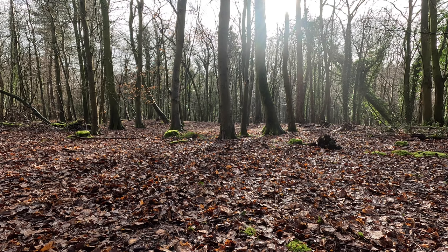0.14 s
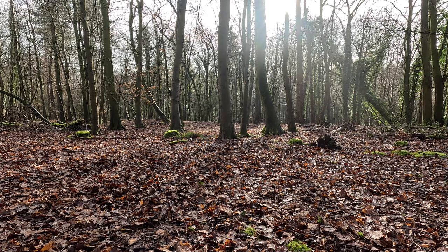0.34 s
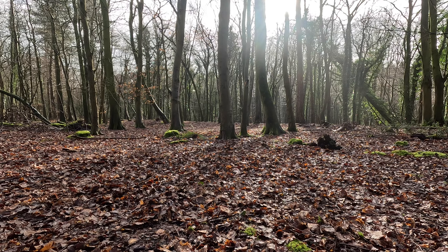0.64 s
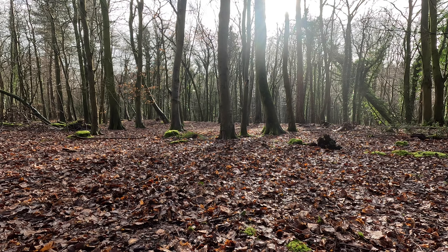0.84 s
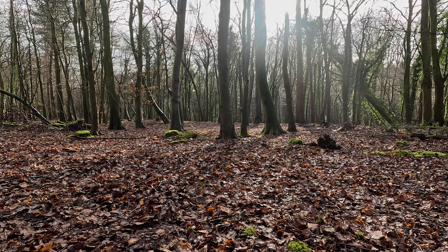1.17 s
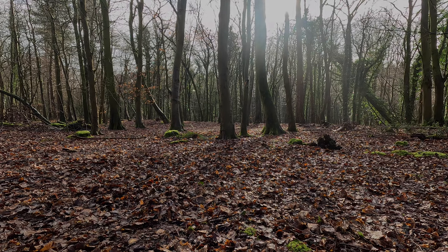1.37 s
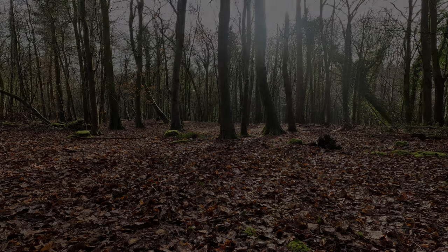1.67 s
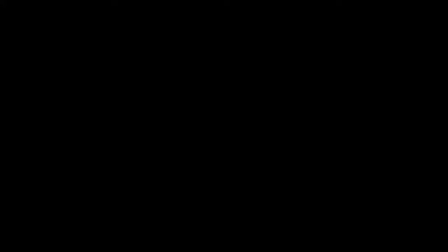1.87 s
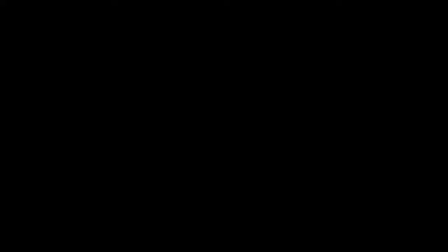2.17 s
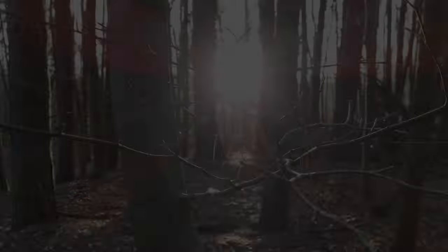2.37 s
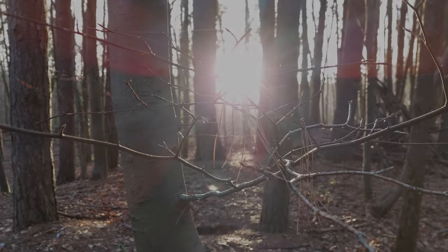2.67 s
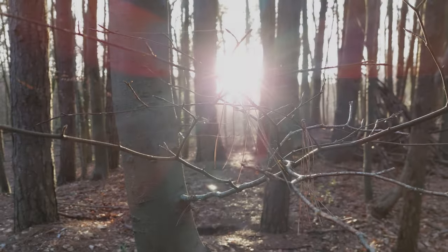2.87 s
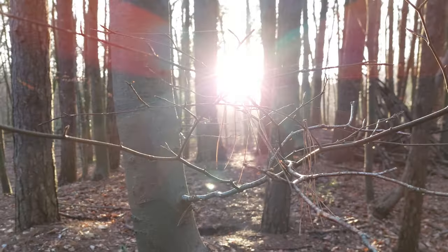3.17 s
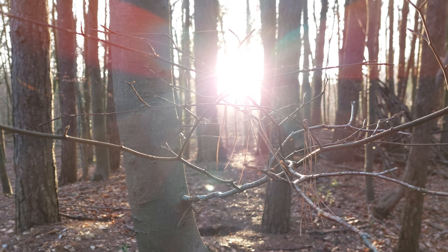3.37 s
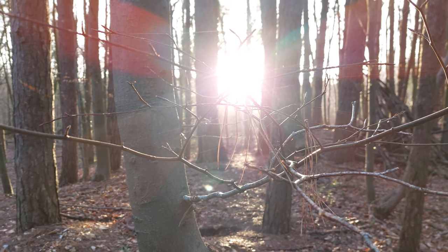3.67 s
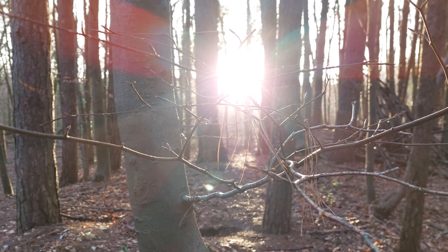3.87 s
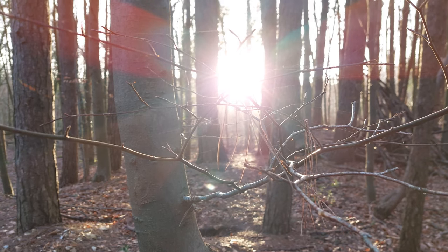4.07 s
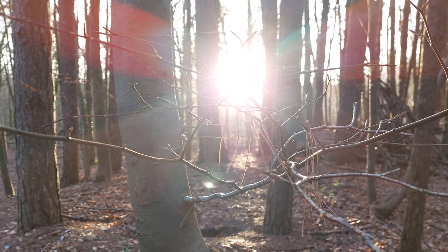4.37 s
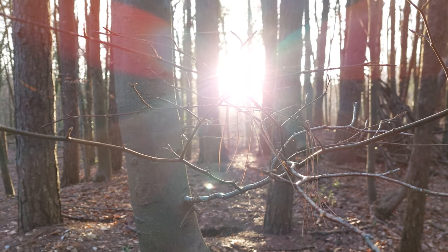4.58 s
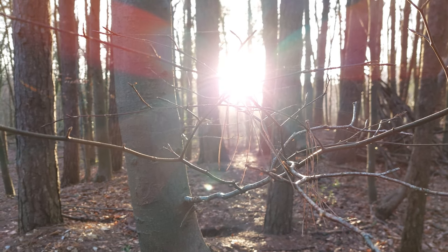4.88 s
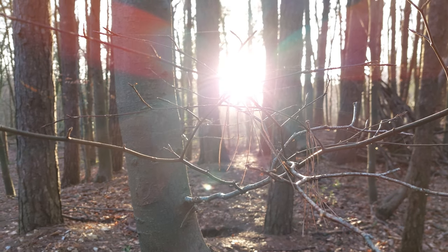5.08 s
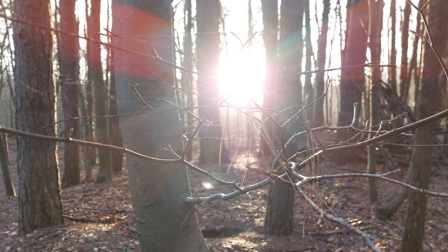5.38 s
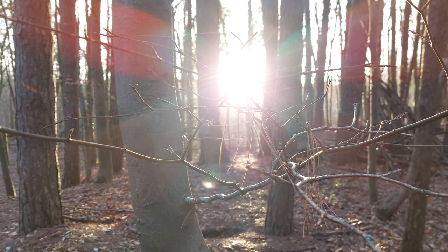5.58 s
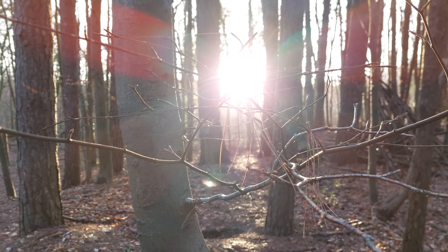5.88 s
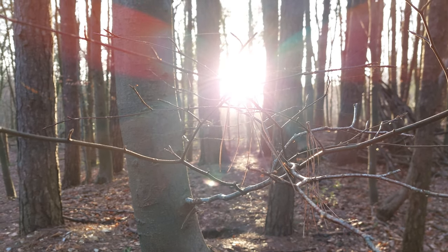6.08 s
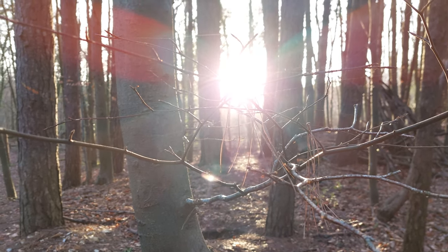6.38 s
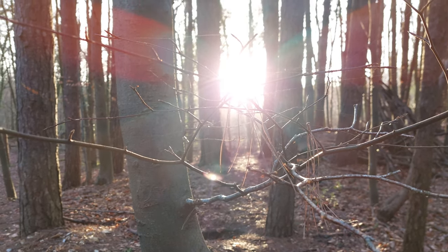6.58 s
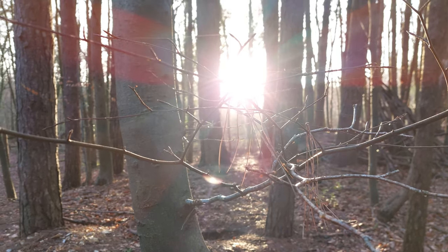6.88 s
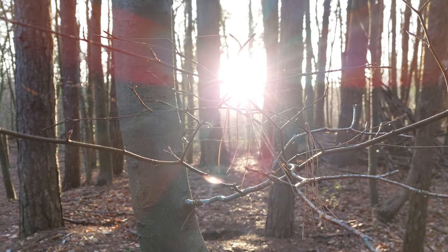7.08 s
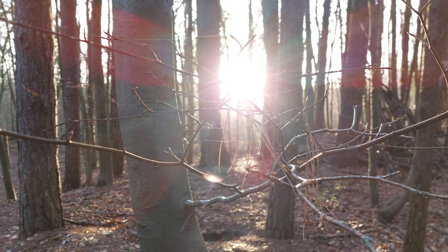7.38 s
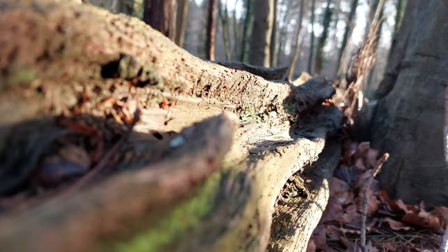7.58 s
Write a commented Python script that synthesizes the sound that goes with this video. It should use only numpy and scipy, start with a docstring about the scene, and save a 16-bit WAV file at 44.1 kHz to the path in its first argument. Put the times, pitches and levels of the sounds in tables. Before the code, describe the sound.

Small woodland birds buzz, whistle and trill over a rumble that fades to faint drone and hiss; twigs snap and a dull knock sounds late.

```python
"""A low rumble and a buzzy bird song open the scene; the rumble later fades to a quiet far drone and hiss.
Whistles, thin high calls and far trills are heard from the rumble onward; zigzag warbles and three trills
of hooked down-sweeps come later. Birds are swept tones, scattered by trunks into a soft tail; rumble, drone
and hiss are coloured noise. Dry leaves rustle close on the right as noise grains, with noise-burst snaps
and a knock and tap of decaying modes. The background drops just before the end.
"""
import sys
import numpy as np
from scipy import signal
from scipy.fft import rfft, irfft
from scipy.io import wavfile
from scipy.ndimage import uniform_filter1d

SR = 44100
rng = np.random.default_rng(int(sys.argv[2]) if len(sys.argv) > 2 else 0)


def to_wav(s):
    """Save 16-bit WAV."""
    ch = np.atleast_2d(s).T  # columns
    pcm = np.round(np.clip(ch, -1, 1) * 32767)  # PCM
    wavfile.write(sys.argv[1], SR, pcm.astype(np.int16))


N = 341334
TIME = np.arange(N) / SR

# Levels are relative, ahead of the mix gains. pan_db is left over right; scatter is a share 0-1.
# Rumble spectrum: freq_hz, level_db
RUMBLE_COLOUR = [(12, -23.5), (25, -11), (55, -2), (80, 0), (110, -3.5), (150, -8), (195, -12.5),
                 (300, -18.5), (410, -27), (560, -43), (1000, -44), (2000, -50.5), (7000, -53),
                 (11000, -75.5)]
# Rumble band that fills in: low_hz, high_hz, first_db, later_db, at_s
RUMBLE_BAND = (215, 399, -4.5, 1.5, 0.52)
RUMBLE_DB, RUMBLE_HOLD_S, RUMBLE_FALL_DB_PER_S = -40.5, 1.593, 17
# Level of the drone's lower resonance: time_s, level_db
LOW_DRONE_LEVEL = [(2.2, -63), (2.45, -58), (2.72, -73), (2.88, -56.5), (3.12, -68), (3.4, -60),
                   (3.88, -65), (4.05, -56.5), (4.2, -67.5), (4.35, -59), (4.62, -69.5), (5.4, -59.5),
                   (5.6, -52), (6.1, -53), (6.35, -46.5), (6.6, -49.5), (6.87, -64), (7.3, -53),
                   (7.7, -65.5)]
# Level of its upper resonance: time_s, level_db
HIGH_DRONE_LEVEL = [(2.2, -73), (2.5, -67), (2.8, -63.5), (3.15, -71), (3.7, -61.5), (3.87, -67),
                    (4.2, -63.5), (4.32, -54), (4.5, -67.5), (4.85, -64.5), (5.03, -66.5), (5.2, -58.5),
                    (5.55, -53.5), (5.7, -62), (6.1, -55.5), (6.2, -56.5), (6.34, -46.5), (6.5, -56),
                    (6.85, -59), (7, -56), (7.7, -69.5)]
# Lower resonance spectrum: freq_hz, level_db
LOW_DRONE_COLOUR = [(20, -40), (70, -15), (105, -5), (135, 3.5), (165, -5.5), (205, -17), (400, -42),
                    (1000, -75)]
# Upper resonance spectrum: freq_hz, level_db
HIGH_DRONE_COLOUR = [(100, -45), (205, -13), (265, 1), (305, -6.5), (370, -17), (500, -22.5), (900, -38.5),
                     (2000, -55), (8000, -75)]
DRONE_BASS_DB, DRONE_BASS_SHARE = -41, 0.28  # bass follows this share of the lower resonance's dB
# Hiss spectrum: freq_hz, level_db
AIR_COLOUR = [(200, -7), (450, 2), (750, 0), (1100, -4.5), (1600, -13), (2500, -13), (4000, -18.5),
              (8000, -21), (16000, -22.5)]
# Hiss band that fills in: low_hz, high_hz, first_db, later_db, at_s
AIR_BAND = (601, 1099, -2.5, 0.7, 1.5)
AIR_DB, AIR_FULL_S, AIR_RISE_DB_PER_S = -68.5, 2.84, 7
# Likeness of the two ears' noise: freq_hz, correlation
EAR_LIKENESS = [(30, 0.9), (70, 1), (140, 0.77), (280, 0.91), (600, 0.3), (1200, 0.063)]
BAND_FILL_HALF_S = 0.065
DROP_S, DROP_LENGTH_S, DROP_DB = 7.54, 0.022, -10

# Decay time of the wood's scatter: freq_hz, t60_s
WOOD_T60 = [(500, 0.17), (3000, 0.86), (5000, 0.96), (8000, 0.67), (16000, 0.15)]
# Echoes off the nearest trunks: delay_s, level_db, pan_db
TRUNK_ECHOES = [(.0125, -12, -3), (.0215, -15, 3)]

# Pitch arch of a buzzy syllable: share_of_syllable, pitch_factor
BUZZ_ARCH = [(0, .79), (.2, .89), (.55, 0.98), (.75, 0.99), (.87, .94), (1, .76)]
# Lines of the buzz: multiple_of_pulse_rate, level_db
BUZZ_LINES = [(5, -23), (7, -15.5), (8, -0.5), (9, -1.5), (10, -5.5), (11, -16.5), (12, -15.5), (13, -13.5)]
# Runs of buzzy syllables: start_s, syllables, period_s, length_s, pulse_rate_hz (crest), level_db,
# arch_depth (exponent), brightness_db_per_octave (at the run's start)
BUZZ_RUNS = [(0.014, 5, 0.047, 0.032, 475, -64, 1.7, -7), (.272, 1, .09, .046, 477, -62.5, 1.9, -8),
             (0.365, 5, .1128, .053, 531, -61.5, 1, -1.5)]
BUZZ_BRIGHTENS_DB_PER_S = 4  # added to the octave slope along each run
BUZZ_PITCH_SPREAD, BUZZ_ARCH_SPREAD, BUZZ_LINE_SPREAD_DB = 0.0161, 0.12, 2.5  # syllable to syllable

# Whistled notes: start_s, length_s, start_hz, end_hz, level_db, pan_db, scatter
WHISTLES = [(0.042, 0.032, 4430, 4340, -59, -4, .17), (0.308, .52, 7320, 7470, -78.5, 5, 0.72),
            (.865, 0.14, 7490, 7460, -75.5, 9, 0.4), (1.297, 0.097, 3990, 3860, -73, 5, 0.2),
            (1.33, .17, 4236, 4180, -74, 5, 0.56), (1.378, 0.11, 3720, 3610, -71.5, 1, .45),
            (1.469, .21, 4540, 4600, -71, 2, 0.4), (1.68, 0.12, 4570, 4510, -79, 0, 0.3),
            (1.68, .13, 4250, 4230, -80, 2, .5), (1.651, 0.056, 7200, 7300, -76.5, 14, .4),
            (2.123, 0.039, 4490, 4230, -75, -3, 0.6), (2.39, .03, 4200, 4350, -76, -2, .4),
            (2.52, 0.23, 3150, 2960, -79.5, 1, 0.75), (3.158, 0.13, 3100, 3025, -65.5, -17, 0.89),
            (3.434, .013, 6550, 8520, -64, 3, 0.3), (3.58, .12, 7450, 7270, -68.5, -1.5, 0.74),
            (3.777, .081, 7760, 7600, -74, -2, .48), (3.895, .11, 4100, 4260, -60.5, -12, 0.66),
            (3.956, .03, 3980, 4700, -63, -14, .25), (4.018, 0.022, 3750, 3140, -56, -18, 0.2),
            (4.078, 0.017, 3600, 2990, -63, -16.5, .15), (4.104, 0.11, 4970, 4800, -63.5, -5, 0.67),
            (4.344, .018, 3750, 3030, -61.5, -16, 0.2), (4.485, 0.022, 2980, 3300, -70, -14, .3),
            (4.652, 0.043, 2615, 2430, -71.5, -12, 0.54), (4.687, .1, 2125, 2075, -64.5, -16, 0.18),
            (4.92, .12, 5250, 4980, -82, 2, .7), (5.055, 0.094, 2620, 2330, -66.5, -20, 0.4),
            (5.135, .09, 2246, 1960, -67.5, -15.5, .35), (5.22, .14, 1940, 2000, -77, -14, 0.57),
            (5.174, 0.084, 4660, 4540, -82.5, 4, 0.45), (6.493, .12, 2765, 2200, -73, -18, .26),
            (7.385, 0.048, 2020, 2426, -72, -12, 0.42), (7.639, 0.059, 3110, 2674, -68, -6, .7)]
# Thin falling calls: start_s, length_s, start_hz, level_db, scatter
HIGH_CALLS = [(0.948, 0.31, 8220, -79, 1), (2.363, 0.022, 8130, -67, 0.96),
              (3.322, 0.096, 7740, -71.5, 0.5), (3.453, .13, 8270, -60, .45),
              (4.689, 0.095, 7530, -75.5, 0.9), (4.882, 0.031, 7800, -66, .97),
              (5.31, .023, 7910, -69.5, .98), (5.608, .048, 7960, -69.5, .8),
              (5.91, 0.031, 7940, -69.5, 0.6), (6.403, .11, 8200, -59, .25)]
HIGH_CALL_FALL = 0.915  # end pitch over start pitch
# Warbles: start_s, notes, first_step_s, note_length_s, level_db, pan_db, scatter
WARBLES = [(1.846, 2, 0.058, .04, -72, 6, .76), (2.086, 1, .06, .035, -76.5, 0, 0.45),
           (2.319, 2, .064, .043, -70.5, 6, 0.82), (4.766, 8, .046, 0.022, -60, -26, 0.27)]
# Warble up-sweep: from_hz, to_hz
WARBLE_UP = (2726, 3790)
# Warble down-sweep: from_hz, to_hz
WARBLE_DOWN = (3420, 2634)
WARBLE_SLOWS_S, WARBLE_ENDS_DB = 0.0026, -8.5  # added to each step; ends against middle

# Far trills: start_s, end_s, notes_per_s, top_hz, bottom_hz, first_db, last_db, pan_db
FAR_TRILLS = [(1.333, 1.78, 25.7, 4750, 3480, -68.5, -68, 1.5),
              (3.7, 4.022, 14.4, 5500, 3400, -62.5, -59, -7),
              (4.029, 4.39, 13.3, 5700, 3150, -61, -61.5, -15),
              (4.402, 4.683, 13.6, 5600, 2850, -67, -67, -8), (4.699, 5.15, 18, 4600, 2606, -65, -77, -8),
              (6.61, 6.964, 32, 4450, 3340, -64.5, -66, -2), (7.639, 7.74, 24.6, 4500, 2753, -59, -80, -8)]
FAR_PITCH_SPREAD, FAR_LEVEL_SPREAD_DB = 0.0403, 2  # note to note

# Twig and leaf snaps, ahead of the leaf colour: time_s, level_db, pan_db
SNAPS = [(1.421, -52, -18), (2.3617, -56, 23), (2.9656, -47, -23), (4.2014, -55, -7), (6.097, -55, -5.5),
         (6.2802, -41, -17.5), (6.303, -39, -22), (6.3245, -38.5, -24), (6.364, -41, -16),
         (6.5033, -42.5, -8.5), (6.783, -52, -9)]
# Leaf spectrum: freq_hz, level_db
LEAF_COLOUR = [(1000, -10), (3000, -8.5), (4500, 1), (7000, 1.5), (9000, -6.5), (12500, 1.5), (16000, -7)]
# Leaves shifting: peak_s, level_db, rise_db_per_s, fall_db_per_s
RUSTLES = [(6.312, -51.5, 600, 218), (6.385, -55, 250, 133), (6.89, -69, 15, 170)]

# One trill syllable: time_s (from its crest), pitch_factor, level_db
HOOK = [(-.018, .865, -7), (-.014, .885, -7.5), (-.005, .96, -2), (0, 1.005, -5), (.005, .94, -2),
        (.008, .79, -0.5), (.012, .655, 2.5), (.02, .585, 2.5), (.032, .53, 0), (.046, .492, -4),
        (.053, 0.478, -19)]
# Trills: first_crest_s (ahead of early_s), syllables, period_s (settled), full_db, crest_hz, pan_db,
# first_weaker_db, first_early_s, lower_share (pitch drop of every other crest)
TRILLS = [(3.117, 11, 0.11, -58, 6560, -2.6, 10.5, 0.01, .004), (5.689, 5, .11, -76.5, 6870, 7, 3, 0, .01),
          (6.851, 8, .1137, -57.5, 6890, -1.5, 10, .028, 0.0348)]
WARM_UP_S, SETTLE_S = 0.177, 0.17  # time constants of level and tempo
TRILL_SPREAD_DB, TRILL_FLUTTER_DB = 0.55, 1.7  # between syllables, within one

# Bright tap modes: freq_hz, level_db, t60_s
TAP_MODES = [(2180, -63, 0.051), (2620, -60.5, 0.052), (4000, -52, .025), (7200, -60, 0.017)]
# Low knock modes: freq_hz, level_db, t60_s
KNOCK_MODES = [(119.3, -36, 0.27), (161.5, -36.5, 0.3), (277, -37, 0.12)]
TAP_S, KNOCK_S = 4.201, 6.388
EDGE_HZ = 15900


def gain_of(db):
    """Decibels to amplitude."""
    return 10 ** (np.asarray(db) / 20)


def evened(x):
    """Scales to an rms of 1."""
    return x / np.sqrt(np.mean(x ** 2) + 1e-20)


def read(points, hz):
    """Reads a spectrum on a log-frequency axis."""
    f, value = np.transpose(points)
    return np.interp(np.log(hz + 1), np.log(f + 1), value)


def level(points):
    """A dB curve as a gain that dies away at 180 dB/s outside its span."""
    s, db = np.transpose(points)
    outside_s = abs(TIME - np.clip(TIME, s[0], s[-1]))
    return gain_of(np.interp(TIME, s, db) - 180 * outside_s)


def held(start_s, end_s, rise_db_per_s, fall_db_per_s):
    """A gain that rises to 1 at start_s, holds until end_s and falls."""
    before_s = np.maximum(start_s - TIME, 0)
    after_s = np.maximum(TIME - end_s, 0)
    return gain_of(-rise_db_per_s * before_s - fall_db_per_s * after_s)


def coloured(x, points):
    """Filters by a spectrum."""
    gain = gain_of(read(points, np.fft.rfftfreq(N, 1 / SR)))
    return irfft(rfft(x) * gain, N)


def placed(x, pan_db):
    """Spreads a sound over left and right at constant power."""
    return evened(gain_of([[pan_db / 2], [-pan_db / 2]])) * x


def add(mix, start_s, sound):
    """Mixes a sound in at a time."""
    part = mix[:, max(round(start_s * SR), 0):][:, :sound.shape[1]]
    part += sound[:, :part.shape[1]]


def wobble(count, size):
    """Smooth chance with an rms of 1, changing over about size samples."""
    noise = rng.standard_normal(count + 4 * size)
    smooth = uniform_filter1d(uniform_filter1d(noise, size), size)
    return evened(smooth[2 * size:-2 * size])


def turns_of(hz, waver):
    """Running phase in radians of a pitch curve with a random drift of rms share waver."""
    drift = evened(uniform_filter1d(rng.standard_normal(len(hz)), 150))
    return 2 * np.pi * np.cumsum(hz * (1 + waver * drift)) / SR


def glide(length_s, from_hz, to_hz, waver):
    """One tone that swells, slides between two pitches and dies away, at an rms of 1."""
    u = np.linspace(0, 1, max(int(length_s * SR), 64))
    tone = np.sin(turns_of(from_hz * (to_hz / from_hz) ** u, waver))
    return evened(tone * signal.windows.tukey(len(u), 0.45))


def ringing(modes, t):
    """Decaying modes that start at t = 0."""
    after = np.maximum(t, 0)
    return sum(gain_of(db - 60 * after / t60_s) * np.sin(2 * np.pi * hz * after)
               for hz, db, t60_s in modes)


def background(colour, gain, pan_db, lead_s, swell_db):
    """Unevenly swelling noise: bass alike in both ears, the left ahead by lead_s; treble diffuse."""
    shared, own = rfft(rng.standard_normal((2, N)))
    hz = np.fft.rfftfreq(N, 1 / SR)
    same = np.clip(read(EAR_LIKENESS, hz), -1, 1)
    delayed = shared * np.exp(-2j * np.pi * hz * lead_s)
    right = same * delayed + np.sqrt(1 - same ** 2) * own
    pair = coloured(irfft(np.array([shared, right]), N), colour)
    swell_band = (hz > 4) * (hz < 12)
    swell = evened(irfft(rfft(rng.standard_normal(N)) * swell_band, N))
    return placed(pair / np.std(pair.mean(0)), pan_db) * gain * gain_of(swell_db * swell)


def filling_in(x, low_hz, high_hz, first_db, later_db, at_s):
    """Moves one band of a noise from one level to another around at_s."""
    bandpass = signal.butter(2, [low_hz, high_hz], "bandpass", fs=SR, output="sos")
    band = signal.sosfiltfilt(bandpass, x)
    span_s = [at_s - BAND_FILL_HALF_S, at_s + BAND_FILL_HALF_S]
    gain = gain_of(np.interp(TIME, span_s, [first_db, later_db]))
    return x + (gain - 1) * band


def wandering(x, share):
    """Drifts a noise's resonances up and down in pitch by an uneven reading speed."""
    place = np.cumsum(1 + share * wobble(N, size=6000)) % N
    return np.array([np.interp(place, np.arange(N), side) for side in x])


def rumble():
    """Low coloured noise that holds, fades out and leaves the drone's deep bass."""
    fading = gain_of(RUMBLE_DB) * held(0, RUMBLE_HOLD_S, 0, RUMBLE_FALL_DB_PER_S)
    drone_bass = placed(gain_of(DRONE_BASS_DB) * level(LOW_DRONE_LEVEL) ** DRONE_BASS_SHARE, pan_db=5.0)
    gain = np.hypot(fading, drone_bass)
    noise = background(RUMBLE_COLOUR, gain, pan_db=-0.7, lead_s=0, swell_db=1.16)
    return filling_in(noise, *RUMBLE_BAND)


def drone():
    """Two noise resonances, each with its own level curve and pitch drift."""
    low = background(LOW_DRONE_COLOUR, 1, pan_db=4.5, lead_s=0.00025, swell_db=1.5)
    low = level(LOW_DRONE_LEVEL) * wandering(low, share=0.06)
    high = background(HIGH_DRONE_COLOUR, 1, pan_db=4.0, lead_s=0.00025, swell_db=1.5)
    return low + level(HIGH_DRONE_LEVEL) * wandering(high, share=0.04)


def air():
    """Hiss of the far wood: coloured noise that fades in, then holds."""
    gain = gain_of(AIR_DB) * held(AIR_FULL_S, DROP_S, AIR_RISE_DB_PER_S, 0)
    noise = background(AIR_COLOUR, gain, pan_db=-2.0, lead_s=0, swell_db=0.78)
    return filling_in(noise, *AIR_BAND)


def trunks(x, early_db, early_s):
    """Scatter from the trees: sparse uneven echoes, an early cluster and a long thin tail."""
    t = np.arange(SR) / SR
    taps = rng.standard_normal((2, SR)) * (rng.random((2, SR)) < 700 / SR) * (t > 0.004)
    early = 1 + gain_of(early_db) * np.exp(-t / early_s)
    taps *= gain_of(3.5 * rng.standard_normal((2, SR))) * early
    hz, s, spectra = signal.stft(taps, SR, nperseg=256)
    decay = gain_of(-60 * s / read(WOOD_T60, hz)[:, None])
    tail = signal.istft(spectra * decay, SR, nperseg=256)[1]
    tail = tail / np.linalg.norm(tail, axis=1, keepdims=True)
    return signal.fftconvolve(x, tail, axes=1)[:, :N]


def buzzing_bird():
    """A fast-warbled whistle: three strong lines, weak sidebands; arches up and drops, loudest at the crest."""
    out = np.zeros((2, N))
    lines, line_db = np.transpose(BUZZ_LINES)
    for start_s, count, period_s, length_s, rate_hz, db, depth, bright_db in BUZZ_RUNS:
        u = np.linspace(0, 1, int(length_s * SR))
        for since_s in period_s * np.arange(round(count)):
            arch_power = depth * (1 + BUZZ_ARCH_SPREAD * rng.standard_normal())
            arch = np.interp(u, *np.transpose(BUZZ_ARCH)) ** arch_power
            pulse_hz = rate_hz * arch * (1 + BUZZ_PITCH_SPREAD * rng.standard_normal())
            phase = turns_of(pulse_hz, waver=0.0051)
            strength_db = line_db + BUZZ_LINE_SPREAD_DB * rng.standard_normal(len(lines))
            tilt_db = bright_db + BUZZ_BRIGHTENS_DB_PER_S * since_s
            # the lines are spread in phase, so each pulse is a tiny chirp
            voice = sum(gain_of(a + tilt_db * np.log2(k)) * np.cos(k * phase + k * k * np.pi / 5)
                        for k, a in zip(np.round(lines), strength_db))
            syllable = evened(voice * arch ** 4.1 * signal.windows.tukey(len(u), 0.2))
            add(out, start_s + since_s, placed(gain_of(db) * syllable, pan_db=-4))
    return out + gain_of(-5.0) * trunks(out, early_db=4.5, early_s=0.033)


def whistling_birds():
    """Single notes from many perches; the farther the bird, the more scatter and pitch blur."""
    direct, scattered = np.zeros((2, 2, N))
    notes = [*WHISTLES, *high_notes(), *warble_notes()]
    for start_s, length_s, from_hz, to_hz, db, pan_db, far in notes:
        far = np.clip(far, 0, 1)
        tone = glide(length_s, from_hz, to_hz, waver=0.0033 + 200 * far ** 4 / from_hz)
        note = placed(gain_of(db) * tone, pan_db)
        add(direct, start_s, np.sqrt(1 - far) * note)
        add(scattered, start_s, np.sqrt(far) * note)
    return gain_of(-2.5) * direct + gain_of(-1.5) * trunks(scattered, early_db=-9.0, early_s=0.043)


def high_notes():
    """High calls from straight ahead, all falling by the same interval."""
    return [(start_s, length_s, hz, hz * HIGH_CALL_FALL, db, 0, far)
            for start_s, length_s, hz, db, far in HIGH_CALLS]


def warble_notes():
    """Up-sweeps and down-sweeps alternate, slowing down, loudest in the middle of the run."""
    notes = []
    for start_s, count, step_s, length_s, db, pan_db, far in WARBLES:
        count = round(count)
        for k in range(count):
            note_s = start_s + k * step_s + WARBLE_SLOWS_S * k * k / 2
            off_middle = (2 * k + 1) / count - 1
            note_db = db + WARBLE_ENDS_DB * off_middle ** 2
            from_hz, to_hz = WARBLE_DOWN if k % 2 else WARBLE_UP
            notes.append((note_s, length_s, from_hz, to_hz, note_db, pan_db, far))
    return notes


def far_birds():
    """Quick runs of uneven down-sweeps, blurred by the trees."""
    out = np.zeros((2, N))
    for start_s, end_s, rate_hz, top_hz, bottom_hz, first_db, last_db, pan_db in FAR_TRILLS:
        for s in np.arange(start_s, end_s, 1 / rate_hz):
            db = np.interp(s, [start_s, end_s], [first_db, last_db])
            db += FAR_LEVEL_SPREAD_DB * rng.standard_normal()
            spread = 1 + FAR_PITCH_SPREAD * rng.standard_normal(2)
            from_hz, to_hz = np.array([top_hz, bottom_hz]) * spread
            note = glide(0.7 / rate_hz, from_hz, to_hz, waver=0.02)
            add(out, s, placed(gain_of(db) * note, pan_db))
    return gain_of(-15.0) * out + gain_of(-5.0) * trunks(out, early_db=2, early_s=0.12)


def snaps():
    """Twigs and leaves snap: noise bursts with a sharp and a weaker slow decay."""
    out, t = np.zeros((2, N)), np.arange(900) / SR
    for s, db, pan_db in SNAPS:
        decay = np.exp(-t / 0.00034) + 0.16 * np.exp(-t / 0.0095)
        crack = rng.standard_normal((2, len(t))) * decay
        add(out, s + 0.0024, placed(gain_of(db) * crack, pan_db))
    return coloured(out, LEAF_COLOUR)


def rustle():
    """Shifting dry leaves: steady noise with sparse grains of random strength."""
    strength = gain_of(3.3 * np.minimum(rng.exponential(1, N), 4))
    struck = rng.random(N) < 1500 / SR
    grains = rng.standard_normal((2, N)) * (0.42 + struck * strength)
    shifting = np.max([gain_of(db) * held(s, s, rise, fall) for s, db, rise, fall in RUSTLES], axis=0)
    return placed(evened(coloured(grains, LEAF_COLOUR)) * shifting, pan_db=-16)


def trilling_birds():
    """Syllables climb, plunge and level out as a trill swells; soft ones barely climb and scatter more."""
    direct, scattered = np.zeros((2, 2, N))
    at_s, pitch, loud_db = np.transpose(HOOK)
    t = np.arange(at_s[0], at_s[-1], 1 / SR)
    shape = uniform_filter1d(np.interp(t, at_s, pitch), 100)
    for first_s, count, period_s, full_db, crest_hz, pan_db, weaker_db, early_s, lower in TRILLS:
        for k in range(round(count)):
            since_s = k * period_s
            start_s = first_s + since_s - early_s * np.exp(-since_s / SETTLE_S) + at_s[0]
            db = full_db - weaker_db * np.exp(-(since_s / WARM_UP_S) ** 2)
            soft = np.clip((-58 - db) / 12, 0, 1)
            uneven_db = TRILL_SPREAD_DB * rng.standard_normal() + TRILL_FLUTTER_DB * wobble(len(t), size=160)
            climb_db = soft * np.interp(t, [-0.016, 0], [-14, 0])
            swell = gain_of(db + uneven_db + np.interp(t, at_s, loud_db) + climb_db)
            # the plunge is a little shallower when the bird holds back
            plunge = 1 - 0.0784 * soft + 0.015 * rng.standard_normal()
            hz = crest_hz * (1 - lower * (k % 2) * shape) * shape ** plunge
            voice = swell * np.sin(turns_of(hz, waver=0.0038))
            add(direct, start_s, placed(voice, pan_db))
            for delay_s, echo_db, echo_pan_db in TRUNK_ECHOES:
                add(direct, start_s + delay_s, placed(gain_of(echo_db) * voice, echo_pan_db))
            add(scattered, start_s, placed(gain_of(5.0 * soft) * voice, pan_db))
    return gain_of(-1.0) * direct + gain_of(-3.5) * trunks(scattered, early_db=3.5, early_s=0.021)


def tap_and_knock():
    """A small bright tap on a twig, then a dead knock: one soft push and a low ring of modes."""
    out, t = np.zeros((2, N)), np.arange(-0.003, 0.25, 1 / SR)
    add(out, TAP_S + t[0], placed(ringing(TAP_MODES, t), pan_db=-20))
    u = (np.pi * 560 * t) ** 2
    pulse = gain_of(-27.5) * (2 * u - 1) * np.exp(-u)
    push = signal.sosfiltfilt(signal.butter(4, 1000, fs=SR, output="sos"), pulse)
    ring = placed(ringing(KNOCK_MODES, t), pan_db=-21)
    add(out, KNOCK_S + t[0], placed(push, pan_db=-29) + ring)
    return out


def scene():
    """Birds, leaves and knocks over a background of rumble, drone and air that drops near the end."""
    drop = gain_of(DROP_DB * np.clip((TIME - DROP_S) / DROP_LENGTH_S, 0, 1))
    far = drop * (rumble() + drone() + air())
    birds = buzzing_bird() + whistling_birds() + far_birds() + trilling_birds()
    return far + birds + snaps() + rustle() + tap_and_knock()


def record(dry):
    """Band limit: a linear-phase low-pass at EDGE_HZ."""
    lowpass = signal.firwin(511, EDGE_HZ, window=("kaiser", 9), fs=SR)
    return signal.oaconvolve(dry, lowpass[None], "same")


dry = scene()
out = record(dry)
to_wav(out)
```